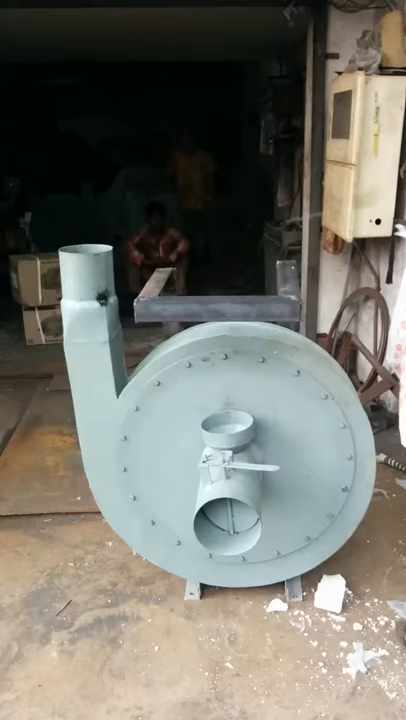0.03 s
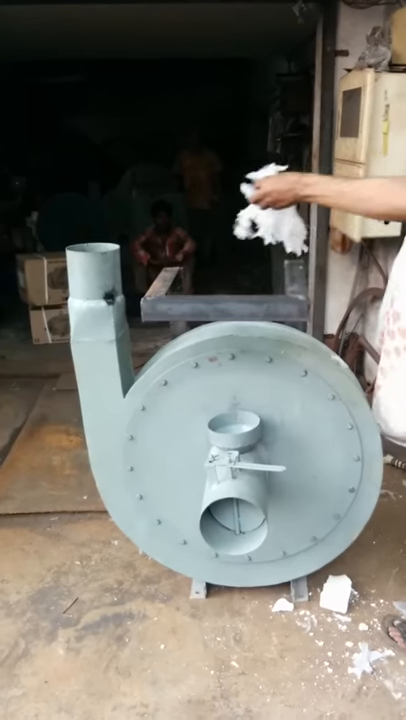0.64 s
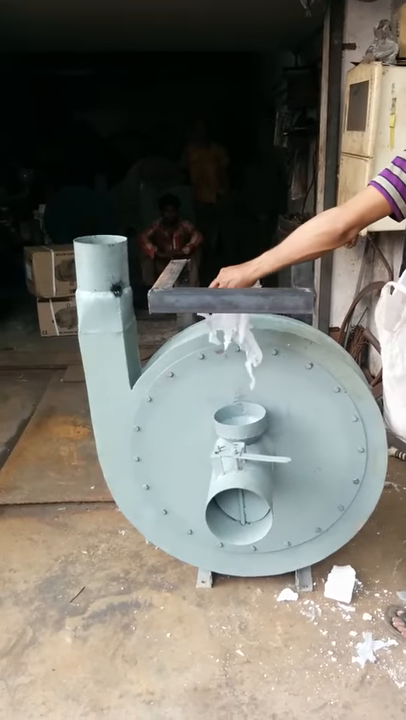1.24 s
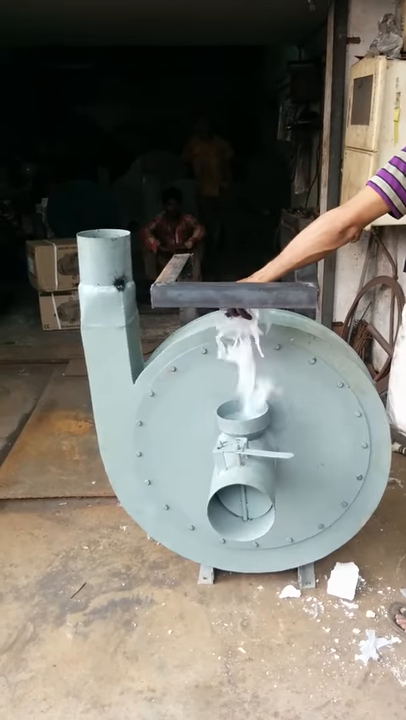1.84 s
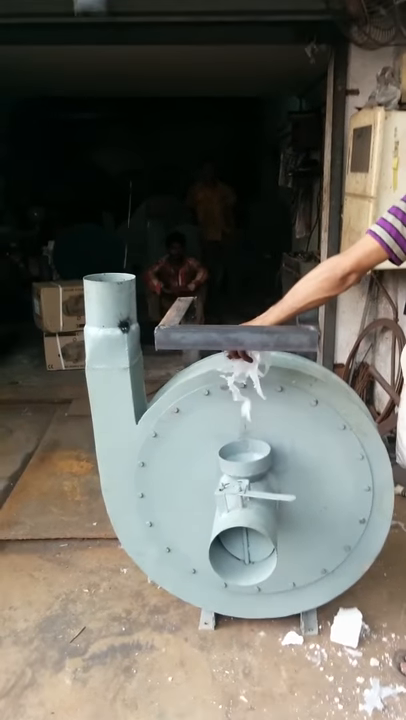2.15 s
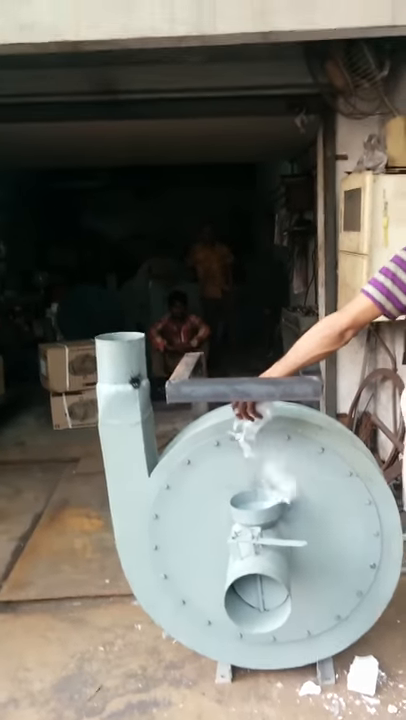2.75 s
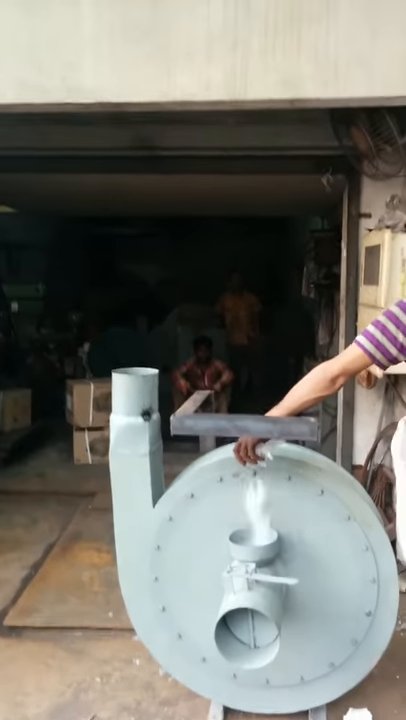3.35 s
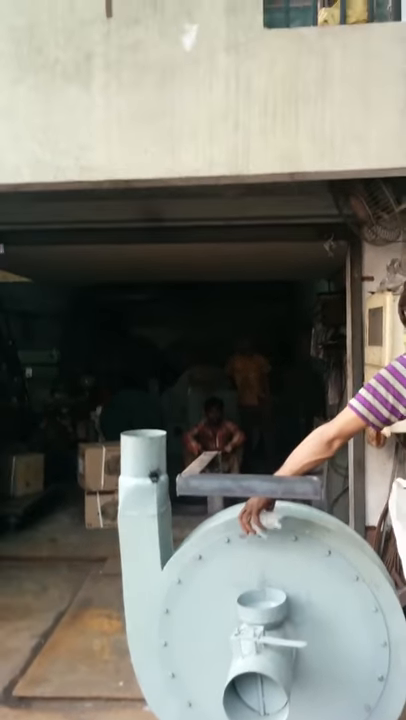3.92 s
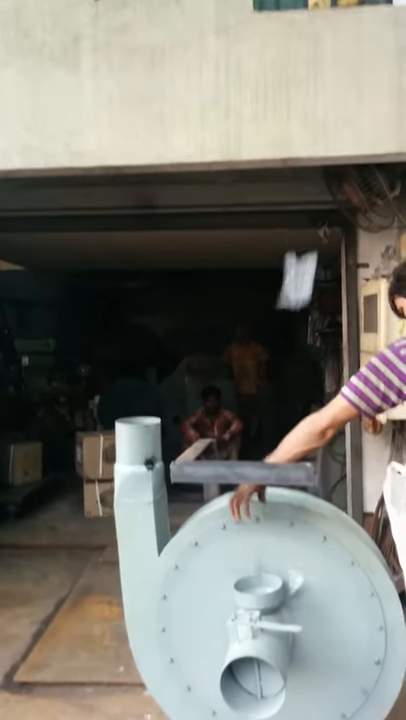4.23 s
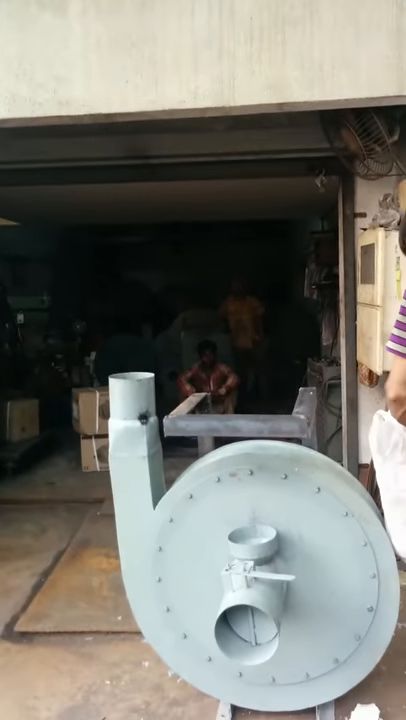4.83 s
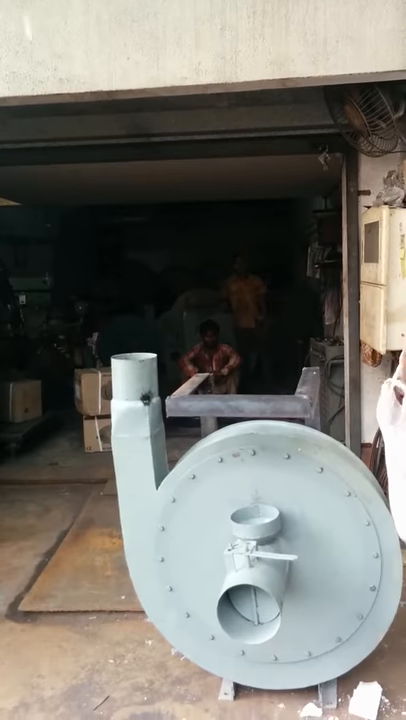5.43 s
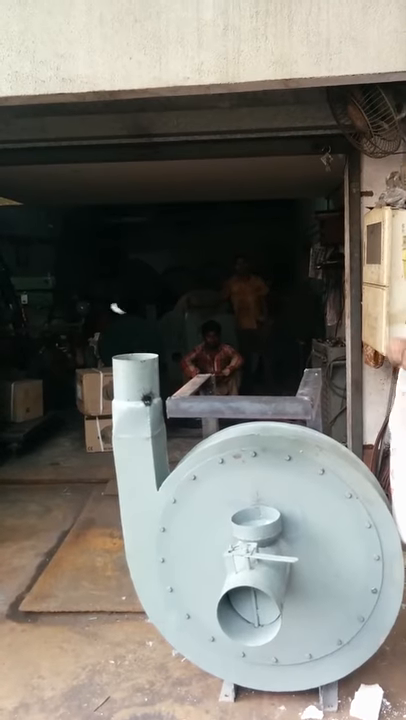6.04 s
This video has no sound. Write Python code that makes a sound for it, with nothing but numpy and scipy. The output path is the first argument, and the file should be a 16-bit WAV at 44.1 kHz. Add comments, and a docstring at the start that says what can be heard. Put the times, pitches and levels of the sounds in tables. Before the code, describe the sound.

Air roars through a big steel blower, heard from close by outdoors, with an uneven hum and a constant rattle of small pieces. After about a second, foam scraps start shattering on the blades in sharp, crunchy clusters, and crumbs hiss and swoosh out of the pipe. Two quick metallic clangs ring around the middle. Toward the end, scattered knocks sound in the casing as the machine keeps running.

```python
"""Foam scraps in a centrifugal blower

A big blower runs outside a workshop: turbulent air roars in its steel casing and pipe over a wavering
drone, and hard bits clatter inside. Scraps of plastic foam are fed in; the impeller smashes them, the
steel clangs twice, and the crumbs swirl out hissing. A phone close by fades in and holds the peaks
down with its limiter."""
import sys
import numpy as np
from scipy import signal
from scipy.fft import rfft, irfft, next_fast_len
from scipy.io import wavfile
from scipy.ndimage import uniform_filter1d, minimum_filter1d, map_coordinates

SR = 44100
rng = np.random.default_rng(int(sys.argv[2]) if len(sys.argv) > 2 else 0)


def unload_audio(sound):
    """Save the sound as a 16-bit wav file, at the path given as the first command line argument."""
    columns = np.transpose(np.atleast_2d(sound))
    # keep every value between -1 and 1, then stretch to whole-number steps
    steps = np.round(np.clip(columns, -1, 1) * 32767)
    wavfile.write(sys.argv[1], SR, steps.astype(np.int16))


N = 268128
TIME = np.arange(N) / SR


def amp(db):
    """Amplitude ratio of a level in decibels."""
    return 10 ** (np.asarray(db) / 20)


def unit(x):
    """Normalisation to rms 1."""
    return x / np.sqrt(np.mean(x ** 2) + 1e-20)


def curves(rows):
    """Linear interpolation: one value per sample for each column after the time."""
    times, *columns = np.transpose(rows)
    return [np.interp(TIME, times, column) for column in columns]


def wobble(rate, size=N):
    """Random modulation: a smooth curve with rate knots a second."""
    return map_coordinates(rng.standard_normal(4096), [TIME[:size] * rate], mode="wrap")


def filtered(x, response):
    """Linear filtering: the spectrum of x times a complex frequency response."""
    size = 2 * next_fast_len((N + SR) // 2)
    return irfft(rfft(x, size) * response(np.fft.rfftfreq(size, 1 / SR)), size)[:N]


def colour(x, spectrum):
    """Minimum-phase filter shaped by (f/Hz, level/dB) rows; white noise keeps its power."""
    def response(hz):
        f, db = np.transpose(spectrum)
        magnitude = unit(amp(np.interp(np.log(hz + 1), np.log(f), db)))
        cepstrum = irfft(np.log(magnitude))
        half = len(cepstrum) // 2
        return np.exp(rfft(np.r_[cepstrum[0], 2 * cepstrum[1:half], np.zeros(half)]))
    return filtered(x, response)


def resonate(x, modes):
    """Parallel resonators from (f/Hz, bandwidth/Hz, level/dB) rows; white noise keeps its power."""
    def response(hz):
        total = 0
        for centre, width, db in modes:
            damping = 1j * hz * 1.5 * width
            total += amp(db) * (damping / (centre ** 2 - hz ** 2 + damping)) ** 2
        return total / np.sqrt(np.mean(abs(total) ** 2))
    return filtered(x, response)


def patchy(x, depth_db, width_hz, life_s):
    """Random amplitude modulation, independent in each patch of frequency and time; rms 1."""
    hz, t, spectra = signal.stft(x, SR, nperseg=512, noverlap=384)
    grid = np.meshgrid(hz / width_hz, t / life_s, indexing="ij")
    field = map_coordinates(rng.standard_normal((400, 600)), grid, order=1, mode="wrap")
    _, modulated = signal.istft(spectra * amp(depth_db * unit(field)), nperseg=512, noverlap=384)
    return unit(modulated[:N])


def pings(rows, attack, t60):
    """Damped oscillation: each (t/s, f/Hz, level/dB) row is a soft blow that rings one resonance."""
    t = np.arange(SR // 8) / SR
    shape = (1 - np.exp(-t / attack)) ** 2 * amp(-60 * t / t60)
    out = np.zeros(N + SR)
    for start, hz, db in rows:
        out[round(start * SR):][:len(t)] += amp(db) * shape / shape.max() * np.sin(2 * np.pi * hz * t)
    return out[:N]


def swarm(lo_hz, hi_hz, count):
    """Superposition of pings at random times, pitches and sizes; rms 1."""
    when, pitch, size = rng.random((count, 3)).T
    rows = np.c_[when * N / SR, lo_hz * (hi_hz / lo_hz) ** pitch, 18 * size]
    return unit(pings(rows, attack=.005, t60=.045))


def impacts(rate, spread_db):
    """Shot noise: tiny impacts of uneven size, on average rate a second; rms 1."""
    impulses = (rng.random(N) < rate / SR) * rng.choice([-1, 1], N)
    return unit(impulses * amp(spread_db * np.clip(rng.standard_normal(N), -2, 2)))


def power_sum(times, levels_db, shape):
    """Incoherent addition: copies of one envelope add in power."""
    power = np.zeros(N + SR)
    for start, db in zip(times, levels_db):
        power[round(start * SR):][:len(shape)] += (amp(db) * shape) ** 2
    return np.sqrt(power[:N])


def clouds(times, levels_db, clear_db_per_s, rise_s=.018):
    """Exponential decay: the envelope of debris clouds that build up and are blown out of the pipe."""
    t = np.arange(SR) / SR
    return power_sum(times, levels_db, (1 - np.exp(-t / rise_s)) * amp(-clear_db_per_s * t))


def bursts(times, levels_db, t60, tail_db, tail_t60):
    """Double-slope decay: the envelope of blows, each a brief peak and a slower spray of fragments."""
    t = np.arange(SR // 2) / SR
    return power_sum(times, levels_db, np.hypot(amp(-60 * t / t60), amp(tail_db - 60 * t / tail_t60)))


# Air flow through the casing: t/s, roar level/dB, inlet rumble level/dB
FLOW_LEVELS = [(.15, -14, -23), (.5, -14, -29.5), (.65, -9.5, -23), (1.5, -12, -26), (2.1, -11, -29),
               (3.1, -12, -26.5), (4.2, -14.5, -28), (4.7, -14, -31), (5.1, -12, -21.5), (5.6, -13.5, -24),
               (6.08, -12, -33)]
# Spectrum of the turbulence: f/Hz, level/dB
EDDY_SPECTRUM = [(100, -39.5), (210, 2), (330, 3.5), (480, -6), (650, -5), (950, -7), (1080, -19.5),
                 (1500, -19), (6000, -44.5)]
# Air resonances of casing and pipe: f/Hz, bandwidth/Hz, level/dB
AIR_MODES = [(229, 16.9, 4), (299.8, 23.6, 2.5), (431.4, 13.8, -4.5), (562.6, 22, -6.5), (781.5, 56, -13.5),
             (871.7, 17, -7), (947.6, 35, -9.5)]
# Spectrum of the inlet rumble: f/Hz, level/dB
RUMBLE_SPECTRUM = [(18, -30), (35, -26), (62, -13.5), (100, -5.5), (140, 1.5), (185, 1), (240, -3),
                   (500, -57)]
def roar():
    """Turbulence: eddies of every size rumble in the inlet and excite the air in casing and pipe."""
    roar_db, inlet_db = curves(FLOW_LEVELS)
    eddies = patchy(rng.standard_normal(N), depth_db=4.6, width_hz=170, life_s=.03)
    rush = amp(-4.5 + 1.2 * wobble(50)) * colour(eddies, EDDY_SPECTRUM)
    draught = patchy(rng.standard_normal(N), depth_db=4.4, width_hz=130, life_s=.035)
    hollow = amp(-2.5 + 2.56 * wobble(30)) * resonate(draught, AIR_MODES)
    gurgle = amp(-11) * swarm(lo_hz=415, hi_hz=958, count=160)
    rumble = amp(inlet_db + 5 + 2.9 * wobble(35)) * colour(rng.standard_normal(N), RUMBLE_SPECTRUM)
    return amp(roar_db) * (rush + hollow + gurgle) + rumble


def flutter(hz):
    """Uneven inflow modulates a tone in amplitude and phase."""
    return amp(3.5 * wobble(45)) * np.sin(2 * np.pi * hz * TIME + .8 * wobble(20))


# Strength of the blade tone: t/s, level/dB
BLADE_LEVELS = [(.15, -39.5), (3.0, -20.5), (4.0, -23.5), (6.08, -18.5)]
def rotor(shaft_hz=48.7, blade_hz=387.5):
    """Periodic forcing: unbalance hums at the shaft rate, and the passing blades sound a tone."""
    blade_db, = curves(BLADE_LEVELS)
    hum = amp(-37.5 + 1.6 * wobble(9)) * np.sin(2 * np.pi * shaft_hz * TIME)
    return hum + amp(blade_db) * flutter(blade_hz)


# Spells of droning: t/s, duration/s, level/dB
DRONE_SPELLS = [(0.413, 0.046, -10.5), (0.91, 0.13, -10.5), (1.468, .13, -13), (2.14, 0.114, -16.5),
                (2.686, 0.43, -15), (3.181, 0.21, -13), (3.477, 0.61, -15), (4.12, 0.3, -10.5),
                (4.508, .1, -10), (5.357, 0.16, -14.5), (5.629, 0.24, -11.5)]
def drone(hz=301.5, attack_s=.024, release_s=.044):
    """Cavity resonance: the casing's main air mode catches in spells that swell, hold and die away."""
    envelope = np.zeros(N)
    for start, length, db in DRONE_SPELLS:
        corners = start + np.array([0, attack_s, length, length + release_s])
        envelope += amp(db) * np.interp(TIME, corners, [0, 1, 1, 0])
    return amp(3) * envelope * flutter(hz)


# Hard bits that stay in the casing: t/s, level/dB
BIT_LEVELS = [(.15, -26.5), (.85, -19), (1.1, -22.5), (4.2, -22.5), (4.8, -20.5), (6.08, -19.5)]
# Spectrum of the casing's dull clack: f/Hz, level/dB
CLACK_SPECTRUM = [(600, -24.5), (1100, 0), (1450, 9), (1900, 2.5), (2300, 10.5), (2850, 1.5), (3150, -15.5),
                  (3800, -9), (4600, -23), (7000, -9), (12000, -45.5)]
# Resonances of the sheet-steel panels: f/Hz, bandwidth/Hz, level/dB
PANEL_MODES = [(1326, 42, 6), (1734, 26, -30), (2125, 39, 5.5), (2505, 210, 7), (2760, 160, 4)]
def clatter():
    """Impact excitation: hard bits and fresh chips batter the panels; larger ones ring a resonance."""
    bits_db, = curves(BIT_LEVELS)
    times, _, crunch_db = np.transpose(BLADE_STRIKES)
    chips = clouds(times, crunch_db - 9.5, clear_db_per_s=104)
    taps = patchy(impacts(rate=3500, spread_db=2), depth_db=4, width_hz=250, life_s=.022)
    rings = swarm(lo_hz=1154.5, hi_hz=2742, count=420)
    drive = unit(taps + .16 * rings) * amp(1.5 * wobble(70))
    casing = colour(drive, CLACK_SPECTRUM) + amp(-4) * resonate(drive, PANEL_MODES)
    return amp(-5.5) * np.hypot(amp(bits_db), chips) * casing


# Loose crumbs that keep circling between the scraps: t/s, level/dB
CRUMB_LEVELS = [(.15, -25.5), (.6, -25), (.88, -27), (1.05, -35), (1.7, -38.5), (1.95, -33), (2.8, -34),
                (3.47, -51), (3.8, -34), (4.25, -33.5), (4.65, -32), (5.55, -34.5), (6.08, -40.5)]
# Spectrum of coarse crumbs: f/Hz, level/dB
CRUMB_SPECTRUM = [(2500, -16.5), (3600, -14), (4900, -24), (5700, -10), (6500, -7), (7200, 0.5),
                  (8000, -0.5), (8800, 2), (10000, -6), (11500, -16.5), (15800, -76)]
# Spectrum of fine dust: f/Hz, level/dB
DUST_SPECTRUM = [(6000, -13), (9500, 12), (12000, 7.5), (14000, 4.5), (15800, -4)]
def crumbs():
    """Shot noise: thousands of crumbs scour the pipe in clumps; the fine dust is the brightest."""
    loose_db, = curves(CRUMB_LEVELS)
    times, crack_db, _ = np.transpose(BLADE_STRIKES)
    cloud_db = -15.5 + .43 * crack_db  # a harder strike throws up a thicker cloud
    hiss = np.hypot(amp(loose_db), clouds(times, cloud_db, clear_db_per_s=88))
    dust = np.hypot(amp(13 + 1.76 * loose_db), clouds(times, cloud_db - 5.5, clear_db_per_s=102))
    clumps = amp(1.5 + 1.1 * wobble(70))
    coarse, fine = impacts(rate=9000, spread_db=3), impacts(rate=8000, spread_db=3)
    coarse = patchy(coarse, depth_db=1.8, width_hz=350, life_s=.03)
    return clumps * (hiss * colour(coarse, CRUMB_SPECTRUM) + dust * colour(fine, DUST_SPECTRUM))


# Scraps meeting the impeller: t/s, crack level/dB, crunch level/dB
BLADE_STRIKES = [(1.1362, -22.5, -27), (1.2618, -7.5, -5.5), (1.33, -9.5, -5), (1.3836, -16.5, -3),
                 (2.0418, -19, -20), (2.0623, -10, -9.5), (2.1038, -11.5, -29), (2.1256, -12, -32),
                 (2.161, -9, -8), (2.1919, -8.5, -16), (2.222, -13.5, -12), (2.4134, -12.5, -16),
                 (2.4578, -32, -18), (2.8483, -19.5, -12.5), (2.8813, -4, -22), (2.9497, -6, -9),
                 (3.0107, -3.5, -23), (3.052, -11, 0.5), (3.136, -18, -10), (3.5315, -4.5, -0.5),
                 (3.575, -7.5, -4), (3.6597, -16.5, -4.5), (4.033, -31, -38), (4.3132, -16.5, -22),
                 (4.345, -12, -8), (4.3826, -8, -2), (5.086, -29, -28), (5.4, -40, -32), (6.0553, -29, -15)]
# Spectrum of a scrap shattering: f/Hz, level/dB
CRACK_SPECTRUM = [(1200, -19.5), (2500, -6.5), (3700, -4.5), (4800, -7.5), (6000, 0.5), (7300, 3),
                  (9000, 3.5), (10500, -4), (12500, -11), (15800, -15)]
# Spectrum of a scrap crunching on the casing: f/Hz, level/dB
CRUNCH_SPECTRUM = [(1200, -10.5), (1800, -11), (2150, 0.5), (2600, 5), (3150, -5.5), (3800, -9),
                   (4600, -15), (8000, -21.5)]
def strikes():
    """Fracture: a blade shatters a scrap with a crack, a spray and a longer crunch on the casing."""
    times, crack_db, crunch_db = np.transpose(BLADE_STRIKES)
    shards = unit(impacts(rate=6000, spread_db=3) * amp(1.5 * wobble(300)))
    crack = bursts(times, crack_db, t60=.07, tail_db=-8, tail_t60=.3) * shards
    crunch = bursts(times, crunch_db, t60=.16, tail_db=-6, tail_t60=.3) * shards
    return amp(-.5) * colour(crack, CRACK_SPECTRUM) + amp(-8.5) * colour(crunch, CRUNCH_SPECTRUM)


# Wads of foam shooting up the pipe: t/s, level/dB
WADS = [(1.379, -29), (2.449, -15.5), (3.664, -22), (4.391, -25), (5.11, -17.5)]
def swooshes(start_hz=2600, fall_octaves_per_s=11, swell_s=.052):
    """Narrow-band noise: each wad leaves with a rough swoosh that sinks in pitch."""
    t = np.arange(SR // 8) / SR
    sweep = np.sin(2 * np.pi * np.cumsum(start_hz * 2 ** (-fall_octaves_per_s * t)) / SR)
    swell = t / swell_s * np.exp(1 - t / swell_s)
    taper = np.hanning(2 * len(t))[len(t):]
    out = np.zeros(N + SR)
    for start, db in WADS:
        roughness = wobble(650, size=len(t))
        out[round(start * SR):][:len(t)] += amp(db) * swell * taper * roughness * sweep
    return out[:N]


# The loudest knocks of scraps inside the casing: t/s, f/Hz, level/dB
SCRAP_KNOCKS = [(1.880, 891, -7.5), (2.012, 558, -6), (2.112, 680, -8.5), (2.428, 1306, -12.5),
                (4.771, 1320, -12.5), (4.875, 570, -8.5), (4.953, 1723, -21), (5.313, 1335, -16.5),
                (5.566, 1867, -17)]
def knocks():
    """Damped resonance: each big piece knocks on the casing and rings it briefly."""
    return pings(SCRAP_KNOCKS, attack=.007, t60=.06)


# Hard blows on the impeller: t/s, level/dB
HARD_BLOWS = [(2.883, 0), (2.945, -4)]
# Modes of the steel impeller: f/Hz, level/dB
IMPELLER_MODES = [(2164, -15), (2510, -16), (3709, -24), (4194, -26.5), (4695, -38), (4920, -25),
                  (5437, -26), (5636, -28), (6120, -28), (8080, -26)]
def clangs(lowest_t60=.58):
    """Free vibration: the struck, spinning impeller rasps and rings; its higher modes die sooner."""
    t = np.arange(SR // 2) / SR
    out = np.zeros(N + SR)
    rasp_band = signal.butter(2, [3500, 6300], "bandpass", fs=SR)
    for start, db in HARD_BLOWS:
        clang = amp(-3.5 - 60 * t / .19) * signal.lfilter(*rasp_band, rng.standard_normal(len(t)))
        for hz, mode_db in IMPELLER_MODES:
            t60 = lowest_t60 * (IMPELLER_MODES[0][0] / hz) ** .3
            waver = .8 * wobble(120, size=len(t))
            tremble_db = 3.6 * wobble(170, size=len(t))
            drift = 2 * wobble(37.4, size=len(t))
            tone = np.sin(2 * np.pi * (hz * t + rng.random()) + waver + drift)
            clang += amp(mode_db + 6 + tremble_db - 60 * t / t60) * tone
        out[round(start * SR):][:len(t)] += amp(db) * clang
    return out[:N]


def scene():
    """Superposition: the blower and all that passes through it add in one channel."""
    blower = roar() + rotor() + drone()
    debris = clatter() + swooshes() + knocks() + crumbs() + strikes() + clangs()
    return (blower + debris)[None]


# The phone's fade-in: t/s, amplitude gain
FADE_GAIN = [(.148, 0), (.155, 0.075), (.24, 0.27), (.36, 0.65), (.58, 0.71)]
def record(dry, drive_db=-1, ceiling_db=-3, window_s=.003, cutoff_hz=15830):
    """Peak limiting: the phone fades in, turns the peaks down and passes nothing above its cutoff."""
    fade, = curves(FADE_GAIN)
    x = dry[0] * amp(drive_db) * fade
    needed_gain = np.minimum(1, amp(ceiling_db) / (abs(x) + 1e-9))
    span = round(window_s * SR)
    gain = uniform_filter1d(minimum_filter1d(needed_gain, span), span)
    return filtered(x * gain, lambda hz: hz < cutoff_hz)[None]


dry = scene()
out = record(dry)
unload_audio(out)
```